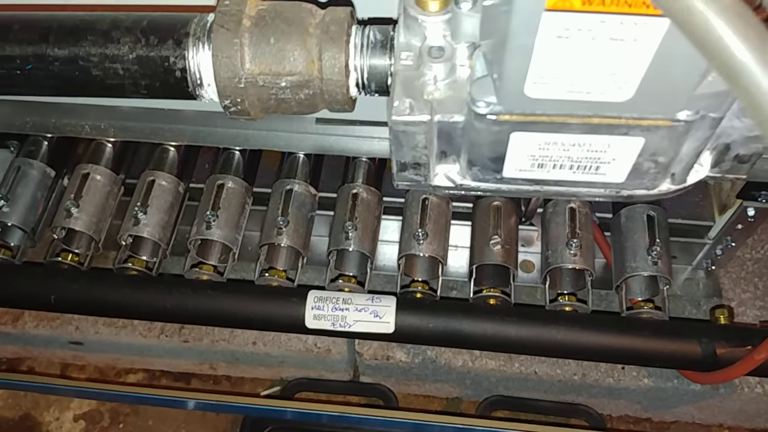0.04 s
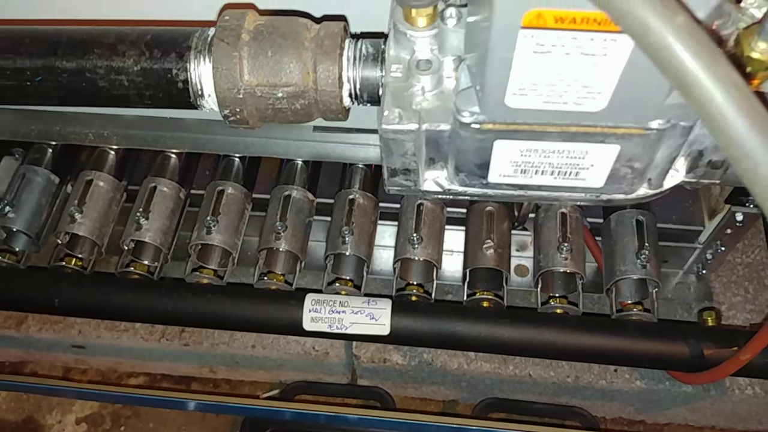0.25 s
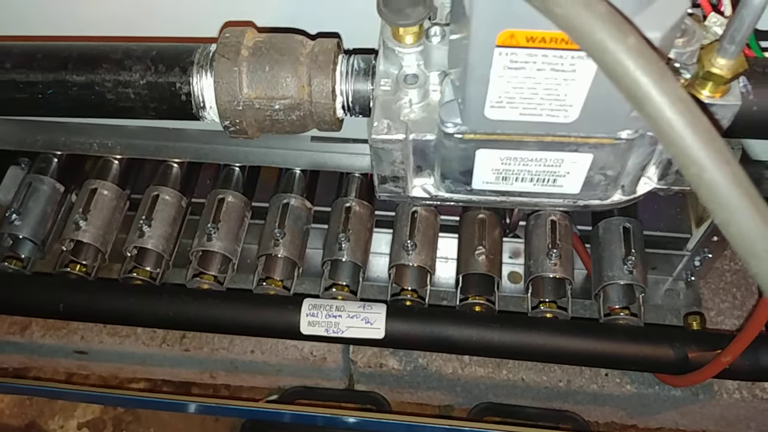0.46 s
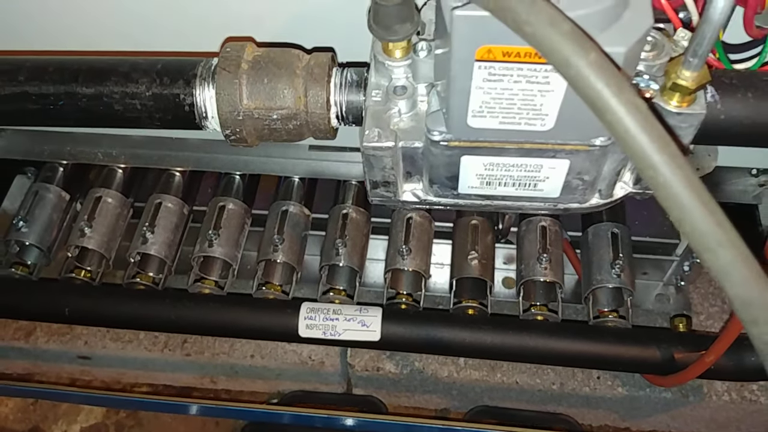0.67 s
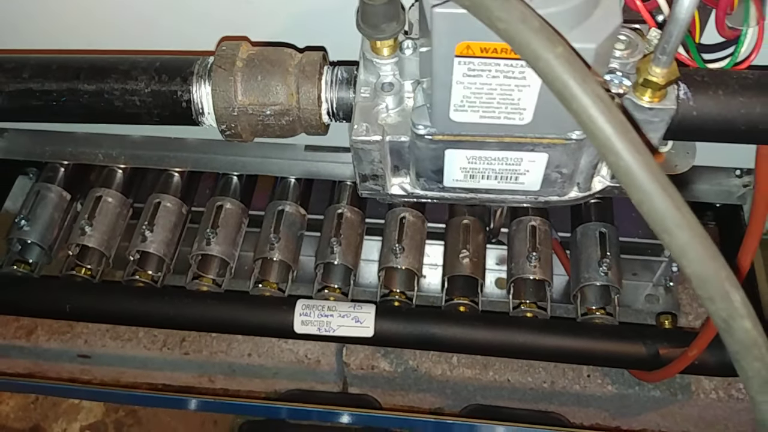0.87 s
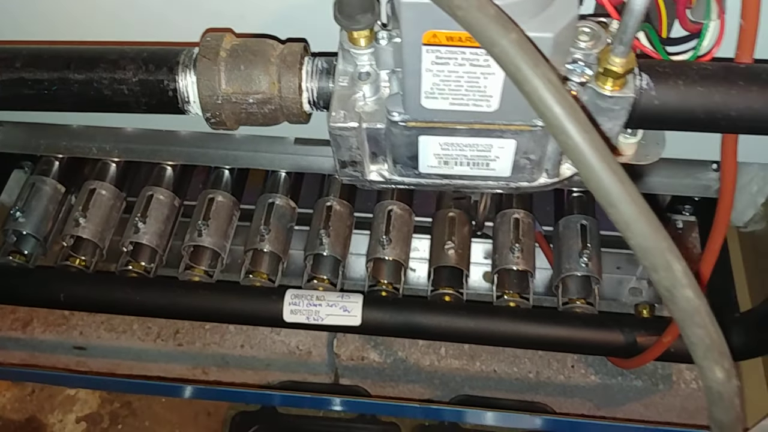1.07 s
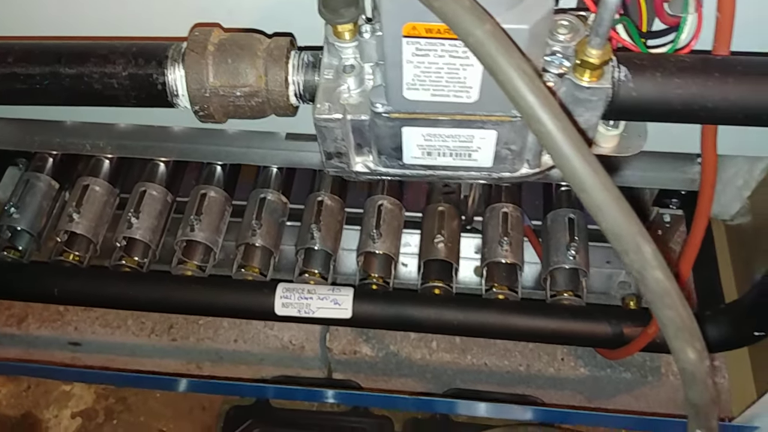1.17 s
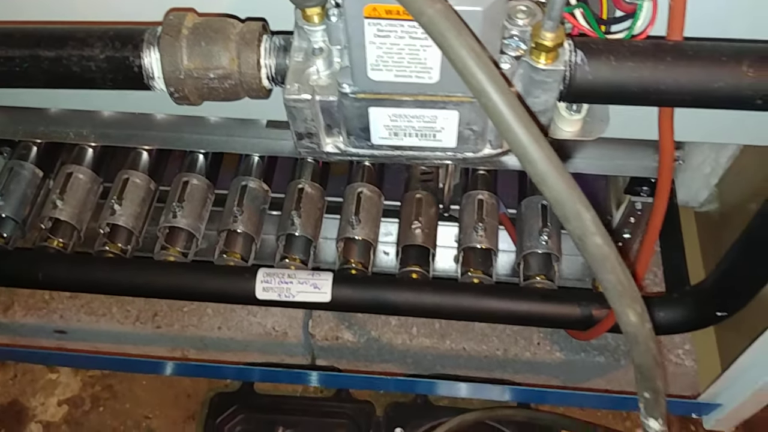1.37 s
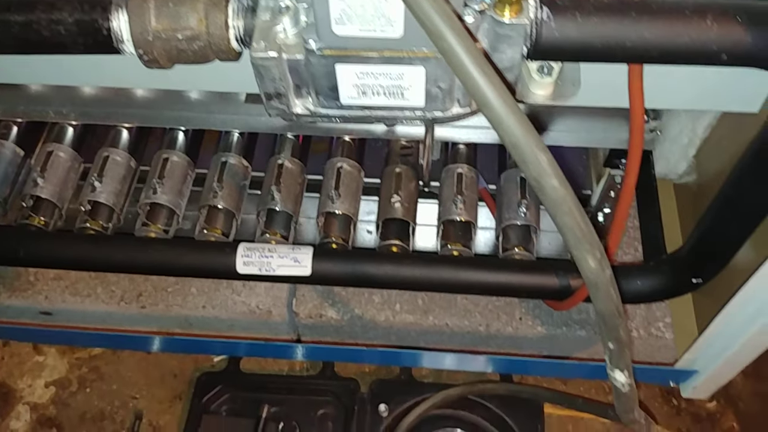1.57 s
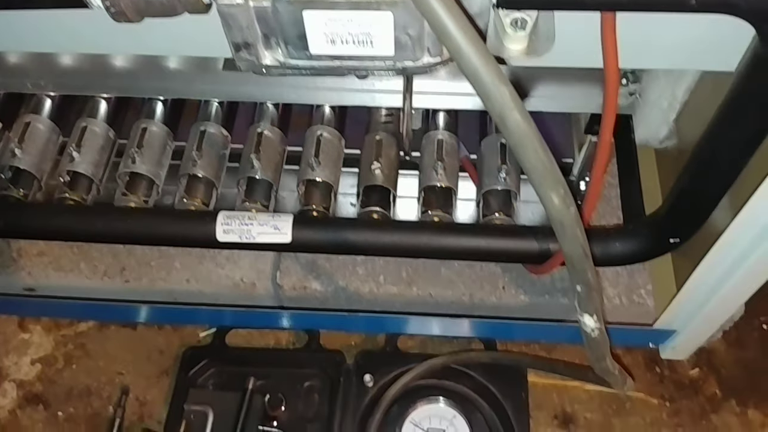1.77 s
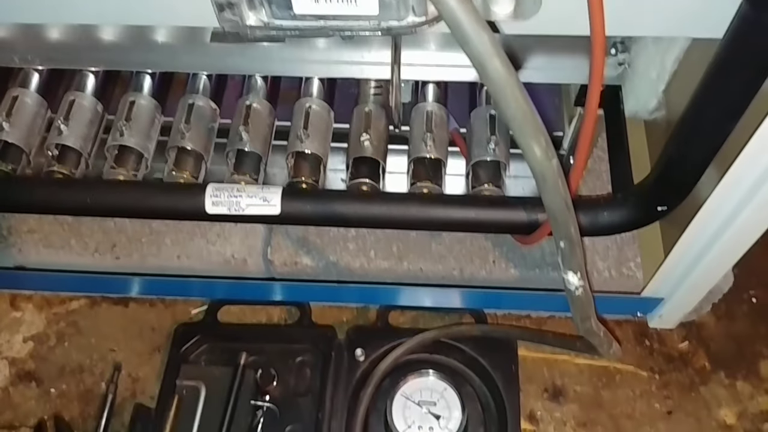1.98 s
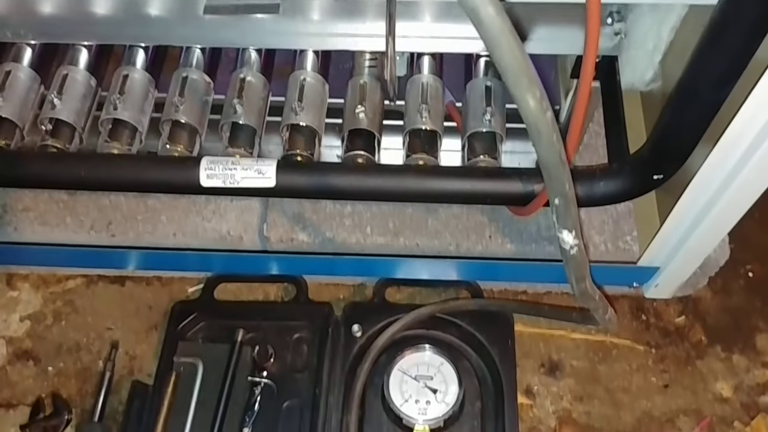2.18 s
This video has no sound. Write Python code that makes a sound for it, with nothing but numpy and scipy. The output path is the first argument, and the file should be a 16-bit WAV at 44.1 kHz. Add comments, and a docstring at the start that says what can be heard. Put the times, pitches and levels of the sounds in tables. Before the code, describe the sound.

A row of gas burners fires continuously in a boiler, its deep uneven rumble dominating a softer roar and airy gas hiss; close stereo microphone in a mechanical room, backing away slightly.

```python
"""A deep rumble, a roar and a hiss: a row of gas burners fires under a boiler while the listener slowly backs away.
The flames are noise: a surging rumble, and a roar coloured by the firebox and lifted by short puffs.
Gas jets are noise with boosts at the pitches where the burner tubes ring as open pipes.
Above them lie a faint hiss, a thin whistle and a wavering tone. Two microphone ports a hand apart hear it all."""
import sys
import numpy as np
from scipy import signal
from scipy.fft import rfft, irfft
from scipy.io import wavfile
from scipy.ndimage import uniform_filter1d

SR = 44100
rng = np.random.default_rng(int(sys.argv[2]) if len(sys.argv) > 2 else 0)


def dump_mix(stems):
    """Bounce the given channels to the path in sys.argv[1] as a 16-bit WAV at rate SR."""
    frames = np.atleast_2d(stems).T  # one column per channel
    limited = np.clip(frames, -1, 1)  # hard clip at full scale
    pcm = np.round(limited * 32767).astype(np.int16)
    wavfile.write(sys.argv[1], SR, pcm)


def attenuation_scalar(level_db):
    """Turn a level in dB into a linear amplitude multiplier (20 dB per decade)."""
    decades = np.asarray(level_db, float) / 20
    return 10 ** decades


N = 98475
HZ = np.maximum(np.fft.rfftfreq(N, 1 / SR), 1)  # pitches of the spectrum; 1 in place of 0, for the logarithms

# Surges of the flames, heard in the rumble: start_s, level_db
FLAME_SURGES = [(0.0, -24.5), (0.12, -22.5), (0.14, -27.5), (0.33, -19), (0.39, -28.5), (0.5, -21.5),
                (0.65, -25), (0.79, -19), (0.81, -30), (0.84, -23.5), (1.01, -22), (1.04, -28), (1.06, -23),
                (1.3, -25), (1.33, -35.5), (1.38, -21), (1.58, -20), (1.6, -26.5), (1.79, -25),
                (1.81, -34.5), (1.85, -16.5), (1.87, -29.5), (1.95, -22.5), (2.01, -26), (2.12, -21.5),
                (2.23, -26)]
# Nearness of the burners: start_s, jet_level_db, roar_above_jets_db
NEARNESS = [(0.0, -36.5, -5.5), (0.16, -34.5, -10.5), (0.35, -38.5, -5.5), (0.4, -37.5, -10),
            (0.54, -36.5, -6.5), (0.61, -36.5, -7.5), (1.25, -37.5, -8.5), (1.72, -39, -6),
            (1.83, -38.5, -8), (2.23, -39, -8)]
# Short puffs of the flames that lift the roar: middle_s, boost_db
FLAME_PUFFS = [(0.145, 4), (0.33, 5), (0.548, 6), (0.74, 5), (0.9, 3), (1.33, 3), (1.57, 3), (1.68, 5),
               (1.772, 4), (2.015, 4)]

# Colour of the deep rumble: pitch_hz, relative_level_db
RUMBLE_COLOUR = [(15, -32), (35, -27), (48, -32), (62, -1.5), (75, -1), (92, -1.5), (120, -3), (138, -7),
                 (155, -14), (173, -22.5), (190, -17), (240, -28.5), (275, -32), (295, -36), (340, -40),
                 (430, -48), (730, -110)]
# Colour of the flames' roar before the firebox boosts: pitch_hz, relative_level_db
ROAR_COLOUR = [(160, -23), (280, -14), (410, -11.5), (711, -4), (841, -9.5), (1090, -2.5), (1380, -14.5),
               (2000, -14), (2600, -21), (3380, -32), (5720, -120)]
# Colour of the jets before the tube boosts: pitch_hz, relative_level_db
JET_COLOUR = [(1350, -37), (2300, -14.5), (2900, -11.5), (3350, -4.5), (4400, -10), (5400, -4.5), (6300, 2),
              (7400, 1), (8000, -7.5), (8800, -17.5), (9200, -25), (9600, -41), (10500, -79), (20000, -110)]
# Colour of the top hiss: pitch_hz, relative_level_db
TOP_HISS_COLOUR = [(8000, -36), (9300, -13), (10200, 6.5), (11200, -5.5), (12500, 0.5), (13150, 3),
                   (13600, 4), (14200, -4), (15000, 4.5), (15700, -1)]

# Firebox resonances in the roar: pitch_hz, width_hz, boost_db
FIREBOX_RESONANCES = [(509, 54, 3), (730, 42, 2.5), (1104, 114, 3.5), (1213, 11, 6), (1654, 116, 5)]
# Pipe resonances of the burner tubes, about evenly spaced: pitch_hz, boost_db
TUBE_RESONANCES = [(2520, 3.5), (2900, 4), (3345, 6.5), (3760, 8.5), (4160, 10), (4595, 9.5), (5025, 10.5),
                   (5420, 7), (5845, 4.5), (6280, 3), (6640, 3.5), (7240, 4.5), (7680, 4.5), (8100, 5.5),
                   (8500, -3)]

# Balance of the noises, left minus right: pitch_hz, difference_db
LEFT_MINUS_RIGHT = [(60, -3.5), (140, -3), (330, -2.5), (520, -3.5), (700, 0), (850, -1.5), (930, -2),
                    (1100, 2.5), (1300, 1), (1650, 5), (2200, -0.5), (4400, 0), (5400, -5.5), (6200, -5),
                    (6800, -1), (7800, 4.5), (8600, -16.5), (9500, -4), (11000, -19.5), (12300, -9),
                    (13150, -13), (15000, -5)]
# How far the right port leads in the noise both ports share: pitch_hz, lead_radians
RIGHT_LEAD = [(60, -0.37), (250, 0.36), (560, 0.1), (750, 0.4), (1000, -1), (2050, 3.5), (3100, 7),
              (4500, 8.5), (5600, 12.5), (6350, 16.5), (7200, 17.5), (8300, 21)]
# Share of the roar's power common to both ports: pitch_hz, share_0_to_1
ROAR_LIKENESS = [(300, 0.93), (750, 0.69), (900, 0.57), (1150, 0.44), (2500, 0.089)]
# Share of the jets' power common to both ports: pitch_hz, share_0_to_1
JET_LIKENESS = [(2500, .35), (3400, .5), (4500, .2), (5800, .38), (7000, .3), (9000, .2)]
# Level of the thin tone before it wavers, one row per port (left, right): level_db
THIN_TONE_LEVELS = [
    [-80],
    [-68],
]

SURGE_SMOOTH_S, SURGE_TOP_HZ = 0.015, 181  # surges are smoothed, and move only the rumble below this
EVEN_S, EVENNESS = 0.035, 0.7  # chance swells slower than this are flattened by this share
RUMBLE_LIKENESS = 0.99  # share of power common to both ports
PUFF_S, TUBE_WIDTH_HZ = 0.02, 190  # full widths at half the boost in dB
TOP_HISS_DB = -59.5
WHISTLE_HZ, WHISTLE_WIDTH_HZ, WHISTLE_DB = 13148, 50, -68
THIN_TONE_HZ = 8497  # average pitch


def rms_one(x):
    """Scale to an average strength (rms) of 1."""
    return x / np.sqrt(np.mean(x ** 2) + 1e-20)


def in_time(rows):
    """Draw straight lines between a table's times, giving each column at every sample."""
    seconds, *columns = np.transpose(rows)
    return [np.interp(np.arange(N) / SR, seconds, column) for column in columns]


def at_hz(points):
    """Read a pitch table at every pitch in HZ, straight on a logarithmic axis."""
    hz, value = np.transpose(points)
    return np.interp(np.log(HZ), np.log(hz), value)


def bell(distance, width):
    """A bell of height 1 that falls to half at half its width from the middle."""
    return 0.5 ** ((2 * distance / width) ** 2)


def resonances(rows):
    """Hollow bodies favour certain pitches: add up bell-shaped boosts in dB."""
    return sum(boost_db * bell(HZ - hz, width_hz) for hz, width_hz, boost_db in rows)


def drift(rate_hz):
    """Slow random wandering with spread 1: noise through a two-step smoothing filter."""
    hop = 40  # samples between drawn points
    memory = np.exp(-2 * np.pi * hop * rate_hz / SR)
    noise = rng.standard_normal(N // hop + 2002)
    slow = signal.lfilter([1], [1, -2 * memory, memory ** 2], noise)
    slow = rms_one(slow[2000:])  # leave out the filter's start
    return np.interp(np.arange(N) / hop, np.arange(len(slow)), slow)


def turbulence(gain, likeness, shared_db=0, own_db=0, rate_hz=8, count=1, low_hz=20, high_hz=20000):
    """Coloured stereo noise whose bands flicker together and each on its own; left-right average has rms 1."""
    common, left, right = rfft(rng.standard_normal((3, N)))
    likeness = np.clip(likeness, 0, 1)
    # Half of the lead goes to each port.
    shift = np.exp(-0.5j * np.interp(HZ, *np.transpose(RIGHT_LEAD)))
    shared = np.sqrt(likeness) * common * [shift, 1 / shift]
    separate = np.sqrt(1 - likeness) * np.array([left, right])
    balance_db = at_hz(LEFT_MINUS_RIGHT) * np.array([[0.5], [-0.5]])
    pair = (shared + separate) * gain * attenuation_scalar(balance_db)

    # Neighbouring bands fade into each other, evenly spaced in log pitch.
    place = np.clip(np.log(HZ / low_hz) / np.log(high_hz / low_hz), 0, 1) * (count - 1)
    together = drift(rate_hz)
    out = 0
    for k in range(count):
        band = np.clip(1 - abs(place - k), 0, 1)
        flicker_db = shared_db * together + own_db * drift(rate_hz)
        out = out + irfft(pair * band, N) * attenuation_scalar(flicker_db)
    return out / np.sqrt(np.mean(out.mean(axis=0) ** 2))


def rumble():
    """Deep combustion noise, almost alike at both ports: its depths ride the surges, its upper edge is steady."""
    noise = rfft(turbulence(1, RUMBLE_LIKENESS)) * attenuation_scalar(at_hz(RUMBLE_COLOUR))
    low_share = 1 / (1 + (HZ / SURGE_TOP_HZ) ** 10)
    deep = irfft(noise * low_share, N)
    edge = irfft(noise * (1 - low_share), N)
    deep_power = deep.mean(axis=0) ** 2

    # Flatten the noise's own chance swells before adding the surges.
    size = int(EVEN_S * SR)
    swell = uniform_filter1d(uniform_filter1d(deep_power, size), size)
    evened = deep * (swell.mean() / (swell + 1e-20)) ** (EVENNESS / 2)
    surge_db = uniform_filter1d(in_time(FLAME_SURGES)[0], int(SURGE_SMOOTH_S * SR))
    surging = evened * attenuation_scalar(surge_db)
    steady = edge * attenuation_scalar(surge_db.mean())
    return (surging + steady) / np.sqrt(np.mean(deep_power))


def roar(roar_db):
    """Mid-pitched flame noise, boosted by the firebox resonances, fluttering and briefly lifted by puffs."""
    t = np.arange(N) / SR
    puffs_db = sum(boost_db * bell(t - middle_s, PUFF_S) for middle_s, boost_db in FLAME_PUFFS)
    colour = attenuation_scalar(at_hz(ROAR_COLOUR) + resonances(FIREBOX_RESONANCES))
    noise = turbulence(colour, at_hz(ROAR_LIKENESS), shared_db=0.54, own_db=1.0,
                       rate_hz=16.3, count=6, low_hz=344, high_hz=2200)
    return attenuation_scalar(roar_db + puffs_db) * noise


def jets(jet_db):
    """Gas jets hiss through burner tubes, whose open-pipe resonances boost parts of the noise."""
    tubes_db = resonances([(hz, TUBE_WIDTH_HZ, boost_db) for hz, boost_db in TUBE_RESONANCES])
    colour = attenuation_scalar(at_hz(JET_COLOUR) + tubes_db)
    noise = turbulence(colour, at_hz(JET_LIKENESS), shared_db=0.58, own_db=1.06,
                       rate_hz=24, count=8, low_hz=2620, high_hz=8600)
    return attenuation_scalar(jet_db) * noise


def top_hiss():
    """Faint, flickering high noise, mostly separate at the two ports."""
    noise = turbulence(attenuation_scalar(at_hz(TOP_HISS_COLOUR)), 0.14, shared_db=1.2, own_db=1.2,
                       rate_hz=7.8, count=6, low_hz=10100, high_hz=15600)
    return attenuation_scalar(TOP_HISS_DB) * noise


def whistle():
    """A thin high whistle: noise squeezed into a narrow peak around one pitch."""
    peak = 1 / (1 + (2 * (HZ - WHISTLE_HZ) / WHISTLE_WIDTH_HZ) ** 2)
    return attenuation_scalar(WHISTLE_DB) * turbulence(peak, 0.1)


def thin_tone():
    """A faint sine wave, mostly at the right port, with randomly wavering level and phase."""
    level_db = np.array(THIN_TONE_LEVELS) + 2.8 * drift(9)
    phase = 2 * np.pi * THIN_TONE_HZ * np.arange(N) / SR + 0.8 * drift(7.4)
    return attenuation_scalar(level_db) * np.sin(phase)


def scene():
    """Add up all the layers, with the jets and roar following the nearness of the burners."""
    jet_db, roar_above_jets_db = in_time(NEARNESS)
    flames = rumble() + roar(jet_db + roar_above_jets_db)
    return flames + jets(jet_db) + top_hiss() + whistle() + thin_tone()


def band_limit(x):
    """A steep low-pass at the top of the band."""
    return signal.sosfilt(signal.butter(12, 15710, fs=SR, output="sos"), x)


def record(dry):
    """The microphone weakens the lowest pitches, below about 45 Hz."""
    low_cut = signal.butter(2, 45, "high", fs=SR, output="sos")
    mix = signal.sosfilt(low_cut, dry)
    return band_limit(mix)


dry = scene()
out = record(dry)
dump_mix(out)
```